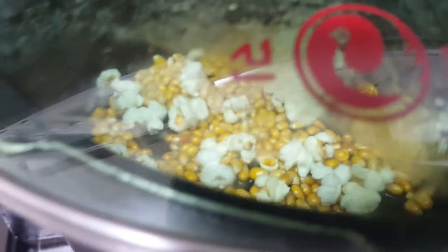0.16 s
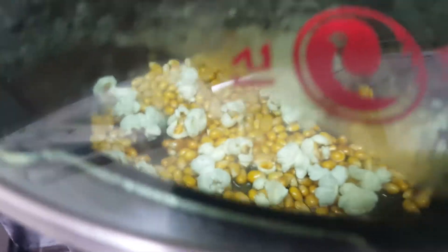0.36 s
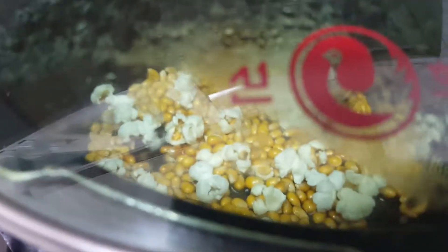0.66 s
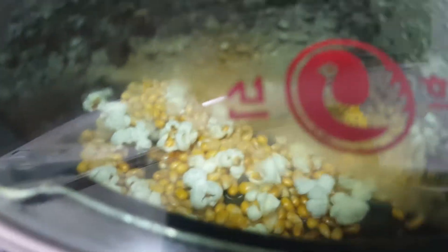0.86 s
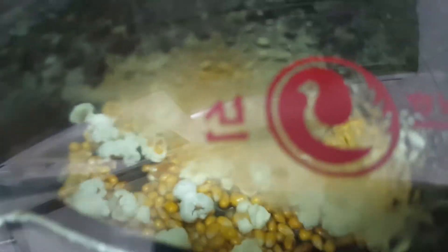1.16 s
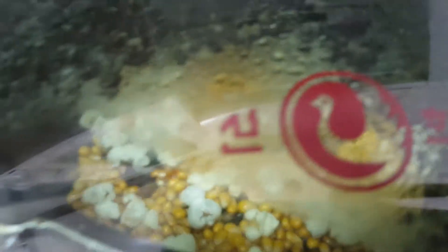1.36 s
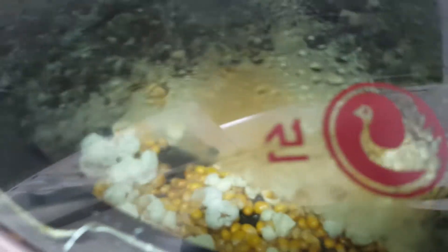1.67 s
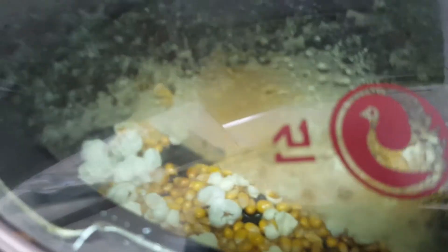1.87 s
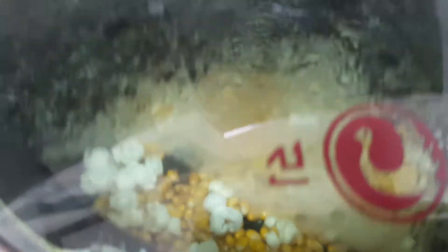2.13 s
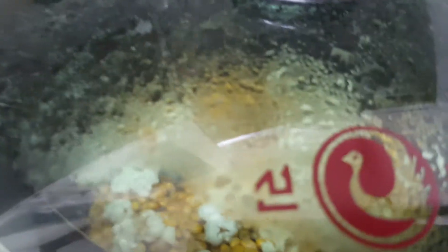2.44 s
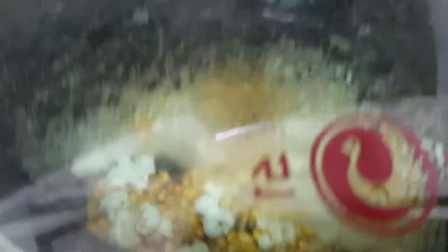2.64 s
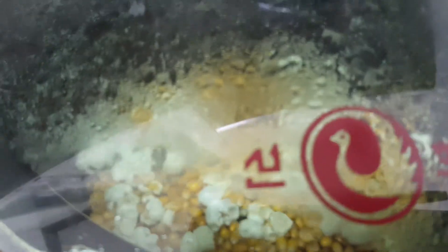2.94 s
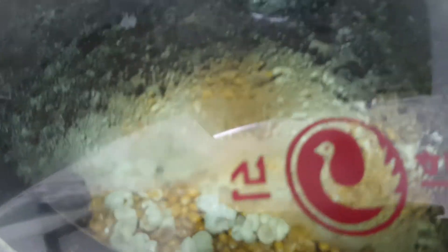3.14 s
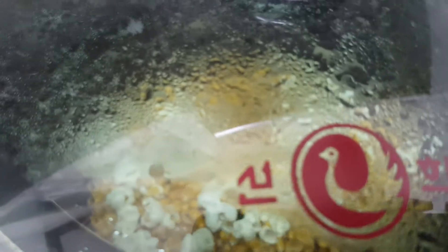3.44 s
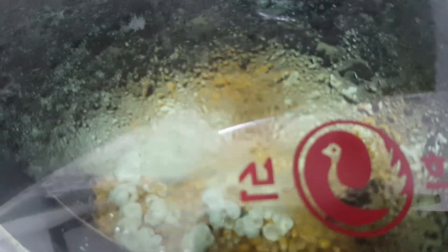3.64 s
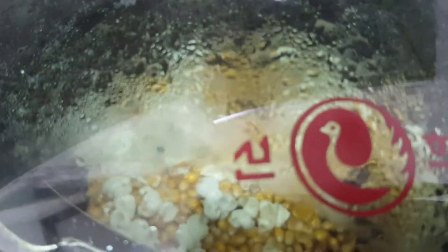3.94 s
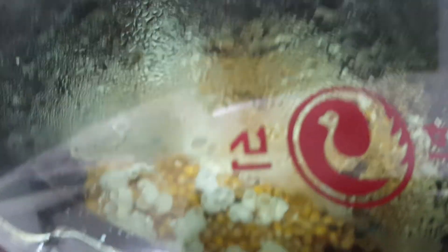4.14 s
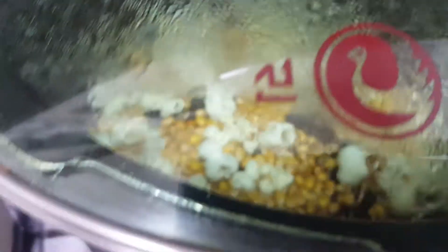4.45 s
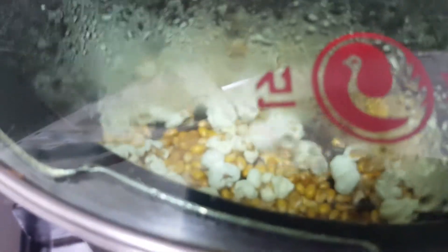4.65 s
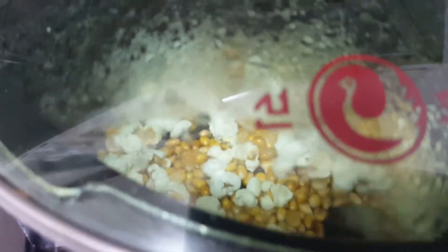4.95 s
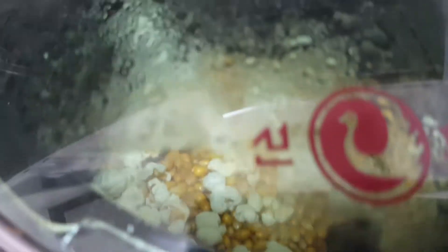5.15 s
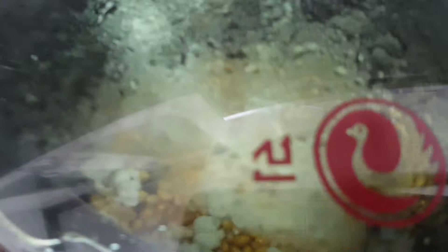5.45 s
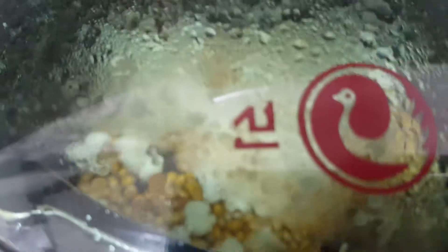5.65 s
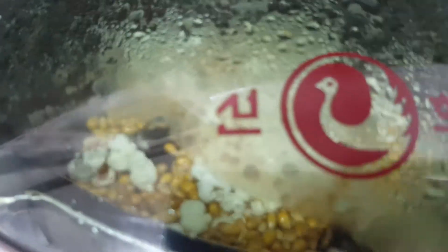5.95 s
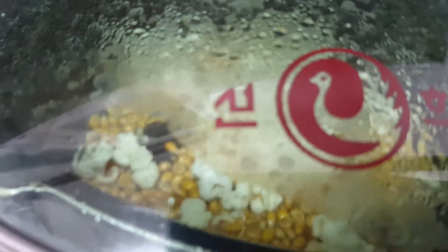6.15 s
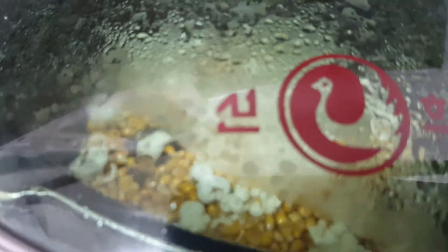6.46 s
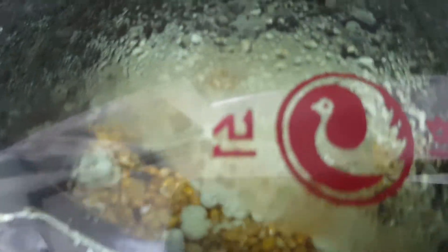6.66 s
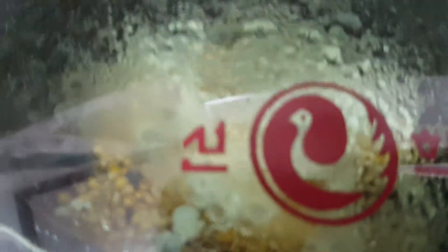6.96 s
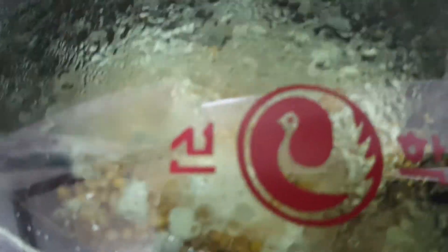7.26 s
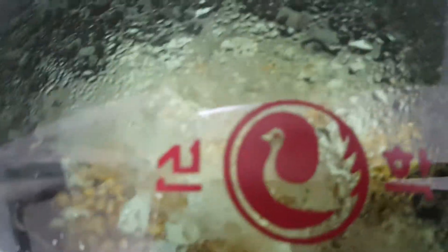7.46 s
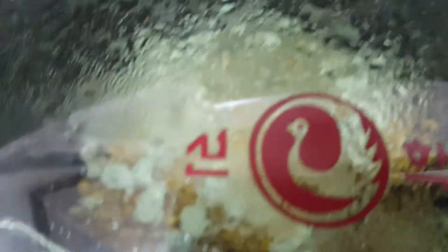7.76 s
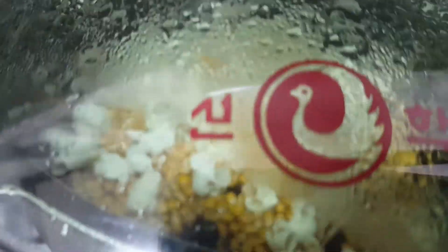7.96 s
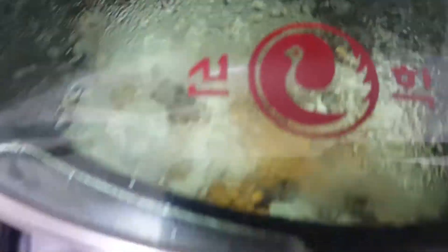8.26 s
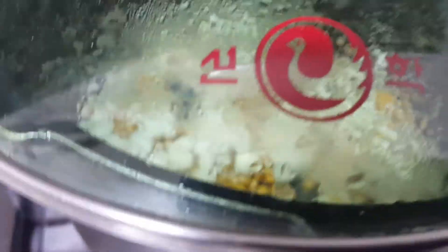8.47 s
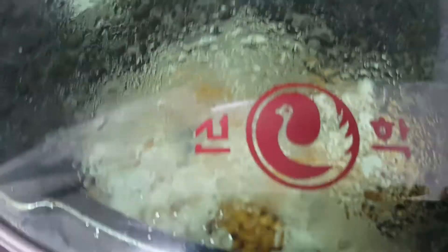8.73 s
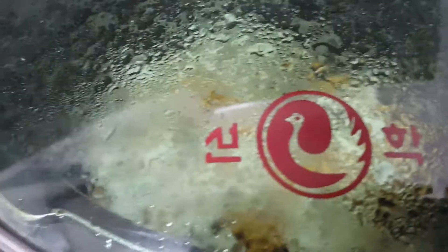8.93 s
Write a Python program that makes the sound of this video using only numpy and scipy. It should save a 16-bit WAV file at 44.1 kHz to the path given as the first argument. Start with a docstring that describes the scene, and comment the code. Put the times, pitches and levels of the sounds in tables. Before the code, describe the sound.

Popcorn popping close by in a metal pot under a glass lid, sparse at first then thick and fast, with dull puffs and kernel ticks.

```python
"""Popcorn in a metal pot under a glass lid, close by in a small kitchen, popping more and more thickly.
From the start oil murmurs and fizzes, kernels tick on lid and wall, and some open with a dull puff of steam.
Soon hulls crack too: each is a noise burst that thumps the air in the pot and rings modes of its wall.
Later gliding jets of filtered noise seep as steam, and a soft sagging sine whistles after the fiercest puff."""
import sys
import numpy as np
from scipy import signal
from scipy.fft import rfft, irfft, next_fast_len
from scipy.io import wavfile
from scipy.ndimage import map_coordinates

SR = 44100
rng = np.random.default_rng(int(sys.argv[2]) if len(sys.argv) > 2 else 0)


def digitize_waveform(pressure):
    """Quantize a signal to 16-bit integers and store it at the path in sys.argv[1].

    Rows of a 2-D input are taken as channels; values are limited to [-1, 1].
    """
    field = np.atleast_2d(pressure).T
    bounded = np.clip(field, -1, 1)
    quanta = np.round(bounded * 32767).astype(np.int16)
    wavfile.write(sys.argv[1], SR, quanta)


N = 401310
AGE = np.arange(SR // 2) / SR  # s since a blow


def amp(db):
    """Decibels to gain."""
    return 10 ** (np.asarray(db) / 20)


def unit(x):
    """Scale to rms 1."""
    return x / np.sqrt(np.mean(x ** 2) + 1e-20)


def along(points, hz):
    """Read (Hz, value) points on a log frequency axis."""
    f, v = np.transpose(points)
    return np.interp(np.log(hz + 1), np.log(f + 1), v)


def fade(t60):
    """Exponential decay by 60 dB in t60 seconds."""
    return np.exp(-np.log(1000) * AGE / t60)


def rise(attack):
    """Soft start with a time constant in seconds."""
    return 1 - np.exp(-AGE / attack)


def add(track, s, x):
    """Mix x into the track at time s."""
    start = max(round(s * SR), 0)
    track[:, start:start + x.shape[-1]] += x[..., :N - start]


def wander(x, step):
    """A smooth random curve along x, with a new value every step."""
    return map_coordinates(rng.standard_normal(int(np.max(x) / step) + 4), [x / step])


# left-right likeness of noise: (f/Hz, correlation)
ALIKE = [(100, 0.98), (400, 0.85), (800, 0.75), (1500, 0.013), (12000, 0.03)]


def noise(gain, size=len(AGE)):
    """Stereo noise of rms 1 with the given gain by frequency; its bass is near mono."""
    hz = np.fft.rfftfreq(size, 1 / SR)
    turn = np.arccos(np.clip(along(ALIKE, hz), -1, 1)) / 2
    spectra = rfft(rng.standard_normal((2, size))) * gain(hz)
    mid, side = irfft(spectra * [np.cos(turn), np.sin(turn)], size)
    return unit(np.array([mid + side, mid - side]))


def colour(points):
    """Gain by frequency from (Hz, dB) points."""
    return lambda hz: amp(along(points, hz))


def resonance(centre_hz, q):
    """Gain by frequency of one resonance."""
    return lambda hz: 1 / np.hypot(1, q * (hz / centre_hz - centre_hz / (hz + 1)))


# sharp pops: (t/s, crack level/dB, air thump level/dB, wall ring level/dB), levels before the layer trims
POPS = [(0.813, -20.5, -29, -33.5), (0.897, -22.5, -32, -49), (0.9786, -27, -30.5, -41.5),
        (1.1611, -69, -41.5, -50), (1.4644, -22.5, -54, -61), (1.4938, -9, -25, -32),
        (1.947, -28.5, -34.5, -40), (2.1036, -19, -17.5, -30), (2.2836, -8, -28, -33),
        (2.7366, -14, -29.5, -38), (2.8457, -16.5, -45, -43), (3.5105, -13, -20, -27),
        (3.6636, -8, -22, -31.5), (4.154, -21, -26, -29.5), (4.233, -14, -21.5, -27),
        (4.3288, -17, -21.5, -21.5), (4.4525, -14.5, -17, -28), (4.589, -16.5, -21, -28.5),
        (4.962, -12.5, -26.5, -29.5), (5.289, -5.5, -25, -24.5), (5.3562, -13.5, -24, -24.5),
        (5.379, -9.5, -20.5, -28.5), (5.5017, -15, -16.5, -38), (5.857, -7.5, -15, -28),
        (6.4296, -6.5, -25.5, -25), (7.006, -13.5, -17.5, -29), (7.1033, -14, -16, -30),
        (7.2283, -18, -12, -30), (7.2719, -22, -26, -25.5), (7.2796, -9, -49, -48),
        (8.09, -6.5, -21, -23.5), (8.1445, -14.5, -18.5, -25.5), (8.2975, -18, -13.5, -31.5),
        (8.6058, -7, -20, -23), (8.6628, -8.5, -20.5, -28)]
# spectrum of a cracking hull: (f/Hz, level/dB)
CRACK = [(200, -5), (700, -0.5), (1100, -5.5), (2500, 2), (3500, 4), (5500, 2.5), (8000, 0.5), (13000, -2),
         (16000, -8.5)]
RING_TILT_DB = 2.75  # per octave, for each 10 dB by which the crack outweighs the thump


def pops():
    """A hull cracks, the starch tears open in a short crackle, and the pot answers."""
    out = np.zeros((2, N))
    for s, crack_db, thump_db, ring_db in POPS:
        # every burst draws its own colour
        hull = lambda hz: colour(CRACK)(hz) * amp(4.6 * np.tanh(wander(hz, step=957)))
        splits = (rng.random(len(AGE)) < 330 / SR) * amp(2.0 * rng.standard_normal(len(AGE)))
        crackle = signal.lfilter([1], [1, -np.exp(-1 / (0.0038 * SR))], splits)
        tearing = unit((0.62 + crackle) * fade(0.12))  # the splits share one fixed store of energy
        crack = noise(hull) * fade(0.014) + amp(-23.0) * noise(hull) * tearing
        # the kernel kicks off from the bottom
        knock = noise(resonance(970, q=3.4)) * rise(0.00032) * fade(0.017)
        tilt_db = RING_TILT_DB * (crack_db - thump_db) / 10
        wall = wall_ring(scatter_db=3, drive=lambda hz: amp(tilt_db * np.log2(hz)))
        add(out, s, amp(crack_db - 5.5) * crack * rise(0.00046))
        add(out, s, amp(thump_db + 10.5) * air_thump())
        add(out, s, amp(ring_db + 10.5) * (wall + amp(-7.5) * knock))
    return out


# modes of the air under the lid, before each thump's random stretch: (f/Hz, level/dB, t60/s)
AIR = [(109, -14, 0.033), (120.3, -14, 0.09), (238.8, -8.5, 0.052), (292.3, 0.5, 0.062), (377.4, -16, 0.15),
       (537, -4.5, 0.0094)]
ECHO_S, ECHO_DB = 0.01297, -10.5


def air_thump():
    """The burst kicks the air under the lid, heard as its change of flow; a near wall returns the thump."""
    stretch = 1 + 0.0457 * rng.normal()
    swing = lambda hz: np.sin(2 * np.pi * hz * stretch * AGE) * SR / (2 * np.pi * hz)
    flow = sum(amp(db) * fade(t60) * swing(hz) for hz, db, t60 in AIR) * rise(0.0014) ** 2
    thump = np.gradient(flow)
    return thump + amp(ECHO_DB) * np.interp(AGE - ECHO_S, AGE, thump, left=0)


# modes of pot wall and lid, before detuning and lid damping: (f/Hz, level/dB, t60/s)
WALL = [(1422, 5.5, 0.2), (1805.5, 7.5, 0.11), (2322, -2.5, 0.33), (2900, -17.5, 0.58), (2957, -10.5, 0.4),
        (3090, -20, 0.15), (3643, -6, 0.19), (4210, -10, 0.11), (5050, -13.5, 0.33), (5190, -7, 0.026),
        (5930, -6.5, 0.053), (6400, -20, 0.066), (7230, -13.5, 0.22)]
LID_T60_S, LID_SCATTER = .14, .35  # median damping time, its log spread


def wall_ring(scatter_db, drive):
    """Each blow shares its energy anew among the modes; the loose lid detunes, blurs and soon damps them."""
    ring = np.zeros((2, len(AGE)))
    common = rng.normal(size=(len(WALL), 1, 1))
    per_ear = .5 * rng.normal(size=(len(WALL), 2, 1))
    driven = np.array([amp(db) * drive(hz) for hz, db, _ in WALL])
    levels = amp(scatter_db * (common + per_ear)) * driven[:, None, None]
    knots = AGE[::SR // 150]
    for (hz, _, t60), level in zip(WALL, levels / np.linalg.norm(levels)):
        blur = np.interp(AGE, knots, 0.7 * rng.normal(size=len(knots)))
        detuned = hz * (1 + 0.0075 * rng.normal())
        ring += level * fade(t60) * np.sin(2 * np.pi * (detuned * AGE + rng.random((2, 1))) + blur)
    seating = np.exp(LID_SCATTER * rng.normal())  # the lid sits differently after every blow
    return ring * rise(0.00013) * (fade(LID_T60_S * seating) + amp(-5.5))


# dull puffs, before trims and pitch sag: (t/s, note level/dB, f/Hz, length/s, steam rush level/dB)
PUFFS = [(0.061, -8.5, 305, 0.023, -28.5), (0.194, -34, 328, 0.03, -38.5),
         (0.705, -18.5, 377.5, 0.032, -39.5), (1.542, -9.5, 323, 0.022, -22.5),
         (1.695, -28, 269, 0.022, -40), (1.861, -27.5, 312, 0.022, -48.5),
         (2.253, -7.5, 301.3, 0.023, -25.5), (2.562, -22.5, 350, 0.048, -36),
         (2.865, -14, 313, 0.029, -31.5), (3.003, -34, 282, 0.051, -36), (3.123, -23.5, 366, 0.023, -50),
         (3.307, -35, 320, 0.014, -51), (3.834, -19, 342, 0.029, -33.5), (4.213, -23, 354, 0.024, -34),
         (4.483, -18, 312, 0.024, -38), (4.573, -21, 314, 0.011, -31.5), (4.665, -3, 323.4, 0.06, -23),
         (4.714, -8, 298, 0.026, -20.5), (4.908, -21.5, 398, 0.052, -30), (6.197, -12, 321.3, 0.052, -18.5),
         (6.244, -5, 396, 0.031, -16.5), (6.72, -22, 301.6, 0.04, -34), (6.862, -27, 408, 0.093, -33),
         (7.062, -5, 300.4, 0.031, -28), (7.273, -16, 333, 0.013, -21), (7.291, -7, 334.2, 0.056, -32),
         (7.737, -16, 316.6, 0.078, -27), (7.87, -7, 323, 0.053, -22.5), (8.002, -14, 326, 0.034, -22.5),
         (8.017, -3.5, 348.2, 0.048, -18)]
# spectrum of the rush of steam, for a 335 Hz puff: (f/Hz, level/dB)
RUSH = [(30, -62), (80, -14.5), (135, 5), (175, -14), (240, 8), (420, 6), (680, -9), (1050, -10.5),
        (1500, -17.5), (2600, -26.5), (5000, -34), (12000, -41.5)]
# cross modes of the air in the pot, blown by the rush: (f/Hz, level/dB)
HOLLOW = [(404, 8), (570, -2), (685, 3), (947, -2.5), (1114, 1.5)]


def puffs():
    """A soft burst: note and rush of steam sag as the pressure drops; a fierce rush also blows the pot's air."""
    out = np.zeros((2, N))
    hollow = lambda f: sum(amp(db) * resonance(hz, q=22)(f) ** 2 for hz, db in HOLLOW)
    for s, db, hz, length, rush_db in PUFFS:
        clock = np.cumsum(.84 + .4 * np.exp(-AGE / 0.0169)) / SR  # runs slower as the pressure drops
        flutter = amp(3.5 * wander(AGE, step=0.0064))
        phase = 2 * np.pi * hz * clock + 0.39 * rng.normal(size=(2, 1)) + 0.45 * wander(AGE, step=0.00972)
        swelling = 1 / (1 + (AGE / length) ** 3)  # the flow holds while the starch expands, then stops
        note = np.sin(phase) * flutter * rise(0.2 * length) * swelling
        hiss = noise(lambda f: colour(RUSH)(f * 335 / hz))  # a smaller kernel's rush lies higher, like its note
        rush = np.array([np.interp(clock, AGE, ear) for ear in hiss])
        # the hull gives way
        splitting = noise(lambda f: resonance(1400, q=0.9)(f) ** 2) * amp(2.5 * wander(AGE, step=0.00284))
        add(out, s, amp(rush_db - 10.5) * splitting * rise(0.00064) * fade(0.1))
        flow = rise(0.0015) * fade(0.13 + 3.55 * length)
        blown = amp(1.33 * rush_db + 5) * noise(hollow)
        add(out, s, amp(db - 4.5) * note + flow * (amp(rush_db + 8.5) * rush + blown))
    return out


# second lobe of starch bursting out within a puff: (t/s, level/dB)
THUDS = [(2.598, -18.5), (2.883, -12), (4.701, -6), (4.906, -13), (6.246, -3), (7.767, -9), (8.019, -7),
         (8.075, -7.5)]


def thuds():
    """A lobe bursts out, knocks the bottom of the pot and kicks its air once."""
    out = np.zeros((2, N))
    for s, db in THUDS:
        knock = noise(lambda hz: resonance(650, q=1)(hz) ** 2) * rise(.001) * fade(0.039)
        add(out, s, amp(db) * (air_thump() * fade(0.095) + amp(-10.5) * knock))
    return out


# kernels and hulls hitting lid and wall, levels before trims: (t/s, level/dB, f/Hz)
TICKS = [(0.02, -17, 5900), (0.639, -25.5, 3740), (0.6555, -26.5, 3230), (0.864, -24, 3080),
         (1.4786, -14.5, 3400), (1.6209, -11, 3540), (2.013, -23.5, 2930), (2.1158, -16, 5050),
         (2.1328, -19, 3220), (2.2853, -3, 6600), (2.3035, -7, 4860), (2.336, -14, 3020),
         (2.917, -21.5, 5100), (3.5201, -7.5, 5980), (3.5639, -10.5, 4620), (4.086, -29.5, 4320),
         (4.186, -17, 5840), (4.364, -7, 3530), (5.022, -20, 3080), (5.3243, -6, 3380), (5.409, -8, 6130),
         (5.5233, -9.5, 4170), (5.5408, -8.5, 6080), (5.5577, -13.5, 3740), (5.6258, -24.5, 2790),
         (5.6492, -14, 4940), (5.876, -1.5, 5140), (6.73, -19, 6900), (7.024, -6, 3770),
         (7.3066, -11, 3880), (7.3323, -9, 3720), (7.3903, -20, 2780), (7.498, -20.5, 3850),
         (7.9638, -21, 3000), (7.9877, -23, 5230), (8.036, -30, 5500), (8.1763, -8, 3940),
         (8.264, -17, 3000), (8.3754, -13.5, 6440), (8.4036, -18.5, 3860)]
# shreds of hull tearing off: (t/s, level/dB)
SNAPS = [(3.518, -22), (3.589, -38), (3.671, -31), (4.186, -39), (5.0194, -34.5), (5.4104, -19.5),
         (5.5224, -28.5), (6.4344, -12.5), (7.113, -25.5), (7.3902, -32), (8.653, -27)]


def ticks():
    """Flying kernels strike lid and wall, shreds of hull tear off; after each pop two crumbs fall back."""
    out = np.zeros((2, N))
    for s, db, hz in TICKS:
        add(out, s, tick(db, hz))
    for s, db in SNAPS:
        add(out, s, amp(db) * snap())
    for s, crack_db, _, _ in POPS:
        for wait, size, pitch in rng.random((2, 3)):
            landing_s = min(s + 0.019 + 0.4 * wait, (N - 1) / SR)
            add(out, landing_s, tick(crack_db - 34.5 + 10 * size, 3000 + 4500 * pitch))
    return out


def tick(db, hz):
    """A hard kernel rings briefly at its own pitch, clacks and stirs the wall."""
    own = lambda f: resonance(hz, q=3)(f) ** 2 + amp(-14.0) * resonance(hz, q=.7)(f)
    phase = 2 * np.pi * (hz * AGE + rng.random((2, 1))) + 0.67 * wander(AGE, step=0.0029)
    ping = np.sin(phase) * fade(0.05)
    ringing = noise(own) * (0.78 * fade(0.045) + 1.27 * fade(0.011))
    clack = noise(resonance(730, q=0.37)) * fade(0.068)
    body = ringing + amp(-4.5) * ping + amp(-4.5) * clack
    wall = wall_ring(scatter_db=4.5, drive=resonance(hz, q=1.8))
    return amp(db) * (amp(-14.0) * body * rise(0.00021) + amp(-16) * wall)


def snap():
    """A thin, bright burst of noise as a shred of hull tears off."""
    return noise(resonance(7400, q=1.0)) * fade(0.1) * rise(0.000098)


# popped kernels tumbling against the pot, levels before trims: (t/s, level/dB)
TUMBLES = [(1.062, -34.5), (2.1894, -43), (2.3794, -28), (2.4843, -37), (2.5411, -33), (3.342, -41),
           (4.4313, -27), (5.689, -32.5), (5.74, -33), (6.5894, -34.5), (7.9027, -19.5), (8.4775, -27.5)]


def tumbles():
    """A light, puffed kernel scuffs the pot in a few soft touches and rings it softly."""
    out = np.zeros((2, N))
    for s, db in TUMBLES:
        soft = resonance(1500 * 2 ** (0.37 * rng.normal()), q=0.84)
        scuff = noise(lambda hz: soft(hz) ** 2) * amp(3.3 * wander(AGE, step=.004)) * fade(0.089)
        wall = wall_ring(scatter_db=1.5, drive=soft)
        add(out, s, amp(db - 5.0) * (scuff + amp(1) * wall) * rise(0.0031))
    return out


def shimmer(x, count, low_hz, high_hz, t60):
    """Sharp sounds set off the crowd of fine high modes of metal and glass, in ever new shares."""
    hz = low_hz * (high_hz / low_hz) ** ((np.arange(count) + rng.random(count)) / count)
    modes = (np.exp(2j * np.pi * hz[:, None] * AGE[:SR // 10]) * fade(t60)[:SR // 10])

    def ring():
        shares = rng.normal(size=(2, count)) + 1j * rng.normal(size=(2, count))
        mixed = (shares @ modes).real
        return mixed / np.linalg.norm(mixed[0])
    return drifting(x, ring)


# steam seeping from split hulls, levels before swell: (start t/s, length/s, level/dB, mid-glide f/Hz)
JETS = [(2.36, 0.16, -49.5, 1280), (4.457, 0.21, -36, 1200), (4.716, 0.18, -38.5, 1930),
        (5.723, 0.073, -55, 2070), (6.018, 0.43, -37.5, 1190), (6.834, 0.16, -44.5, 1860),
        (7.479, 0.37, -39, 1200)]
JET_GLIDE = 1.32  # a jet starts this factor below its pitch and ends as far above it


def steam():
    """Jets of steam swell and die, and their two resonances glide upwards."""
    out = np.zeros((2, N))
    for s, length, db, pitch_hz in JETS:
        size = int(length * SR)
        u = np.linspace(0, 1, size)
        low, high = resonance(pitch_hz, q=1.7), resonance(2.1 * pitch_hz, q=2.2)
        hiss = noise(lambda hz: low(hz) ** 2 + amp(-7.5) * high(hz) ** 2, 2 * size)
        clock = np.cumsum(JET_GLIDE ** (2 * u - 1))
        jet = np.array([map_coordinates(ear, [clock]) for ear in hiss])
        add(out, s, amp(db + wander(u * length, step=0.0236)) * unit(jet) * np.sin(np.pi * u))
    return out


WHISTLE_S, WHISTLE_DB = 6.29, -26  # just after the fiercest puff
WHISTLE_ATTACK_S, WHISTLE_HOLD_S, WHISTLE_FADE_DB_PER_S = 0.11, 0.1, 97
WHISTLE_HZ, WHISTLE_SAG_HZ, WHISTLE_SAG_S = 400, 88, 0.16  # first pitch, depth and time constant of sag


def whistle():
    """Steam sets the pot's air whistling; the note sags and fades as the pressure drops."""
    out = np.zeros((2, N))
    hz = WHISTLE_HZ - WHISTLE_SAG_HZ * rise(WHISTLE_SAG_S) + 7 * wander(AGE, step=0.0154)
    db = WHISTLE_DB - WHISTLE_FADE_DB_PER_S * np.maximum(AGE - WHISTLE_ATTACK_S - WHISTLE_HOLD_S, 0)
    level = amp(db + 2 * wander(AGE, step=0.0122)) * np.minimum(AGE / WHISTLE_ATTACK_S, 1)
    add(out, WHISTLE_S, level * np.sin(2 * np.pi * np.cumsum(hz) / SR))
    return out


# spectrum of the boiling murmur: (f/Hz, level/dB)
BOIL = [(24, -61), (40, -9.5), (175, -27), (227, -7), (336, -1), (371, -6), (436, -6), (576, -11),
        (2000, -19), (2600, -39.5), (4400, -120)]
# spectrum of the fizzing oil: (f/Hz, level/dB)
FIZZ = [(590, -66), (1000, -33), (1430, 2), (1710, -17), (1870, -4.5), (2840, -6.5), (12300, -9),
        (16000, -13.5)]


def simmer(spits_per_s, spit_db):
    """The pot murmurs; the oil fizzes more as it boils harder, and spits tiny drops."""
    boil_db = boiling()
    drops = (rng.random(N) < spits_per_s / SR) * amp(5.5 * rng.standard_normal(N))
    spits = signal.lfilter([1], [1, -np.exp(-1 / (0.01 * SR))], drops)
    fizz = noise(colour(FIZZ), N) * (1 + amp(spit_db) * spits)
    murmur = noise(colour(BOIL), N) * amp(6.4 * np.tanh(wander(np.arange(N) / SR, step=0.011)))
    return amp(boil_db - 5.0) * murmur + amp(0.49 * boil_db - 30.0) * fizz


SIMMER_DB, HEATING_DB_PER_S = -69.5, 2.24  # boil strength at the start, growth as the pot heats
STIR_DB, SETTLE_DB_PER_S = -18.5, 46  # stir relative to the puff's rush, then settling
SEEP_DB = 6.5  # bubbling relative to the jet


def boiling():
    """Boil strength in dB: the pot heats steadily, and every puff and jet of steam stirs the oil."""
    t = np.arange(N) / SR
    power = amp(SIMMER_DB + HEATING_DB_PER_S * t) ** 2
    for s, _, _, _, rush_db in PUFFS:
        power += (t > s) * amp(rush_db + STIR_DB - SETTLE_DB_PER_S * np.abs(t - s)) ** 2
    for s, length, db, _ in JETS:
        power += (amp(db + SEEP_DB) * np.sin(np.pi * np.clip((t - s) / length, 0, 1))) ** 2
    return 10 * np.log10(power)


# reverberation time of the room: (f/Hz, t60/s)
KITCHEN = [(100, 0.76), (300, 0.38), (1500, 0.5), (5000, 0.31), (14000, 0.32)]


def kitchen():
    """The answer of the small hard room, 10 ms late; each frequency dies at its own speed."""
    hz, t, z = signal.stft(noise(np.ones_like), SR, nperseg=256)
    decay = np.exp(-np.log(1000) * t / along(KITCHEN, hz)[:, None])
    tail = signal.istft(z * decay, SR, nperseg=256)[1]
    return np.pad(tail / np.linalg.norm(tail[0]), ((0, 0), (SR // 100, 0)))


DRIFT_S = .4


def drifting(x, response):
    """Crossfade to a new response every DRIFT_S, as the kernels shift and the microphone sways."""
    out = np.zeros((2, N))
    step = int(DRIFT_S * SR)
    for centre in range(0, N + step, step):
        span = np.arange(max(centre - step, 0), min(centre + step, N))
        part = x[:, span] * (1 - np.abs(span - centre) / step)
        add(out, span[0] / SR, signal.fftconvolve(part, response(), axes=1))
    return out


def room_rumble():
    """The steady low rumble of the kitchen: noise through one broad resonance."""
    return amp(-56) * noise(resonance(58, q=0.18), N)


def scene():
    """Everything in the pot, with the kitchen around it."""
    sharp = (pops() + ticks()) * amp([[-.6], [.6]]) + tumbles()  # left, right gain in dB
    sharp = sharp + amp(-5) * shimmer(sharp, count=110, low_hz=2699.0, high_hz=13140, t60=0.042)
    dull = puffs() + thuds()
    room = drifting(amp(-10.0) * sharp + amp(-8.5) * dull, kitchen)
    oil = simmer(spits_per_s=45, spit_db=0)
    return sharp + dull + room + steam() + whistle() + oil + room_rumble()


TOP_HZ = 15900


def record(dry):
    """The microphone rounds off the highest peaks and keeps nothing above its band limit."""
    held = dry / (1 + (1.05 * dry) ** 4) ** (1 / 4)
    size = next_fast_len(N + SR // 2)
    return irfft(rfft(held, size) * (np.fft.rfftfreq(size, 1 / SR) < TOP_HZ), size)[:, :N]


dry = scene()
out = record(dry)
digitize_waveform(out)
```